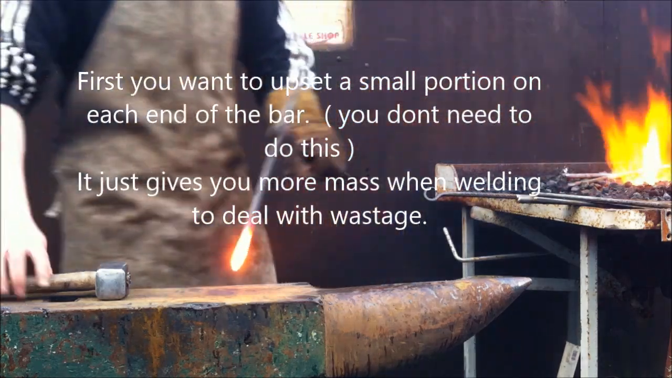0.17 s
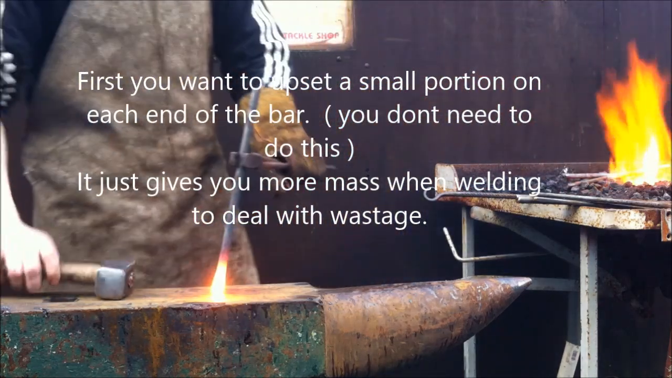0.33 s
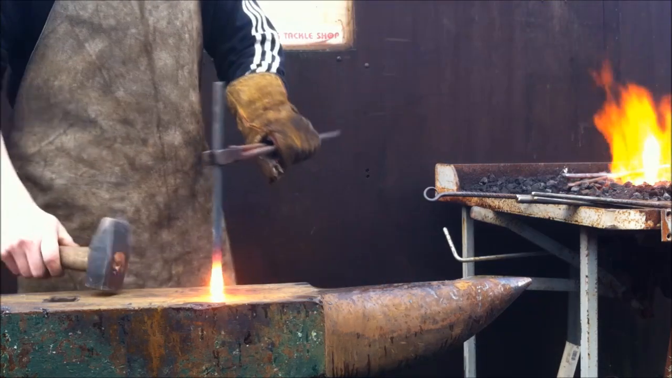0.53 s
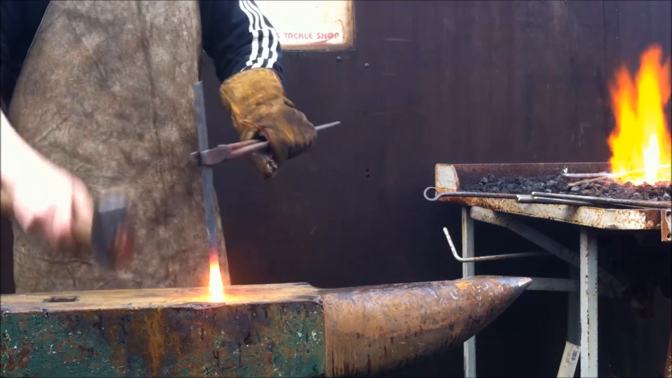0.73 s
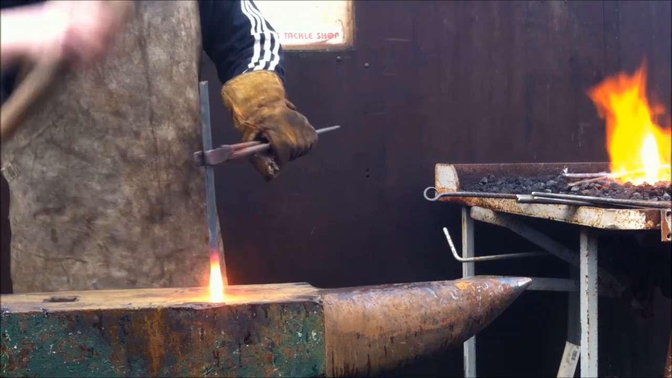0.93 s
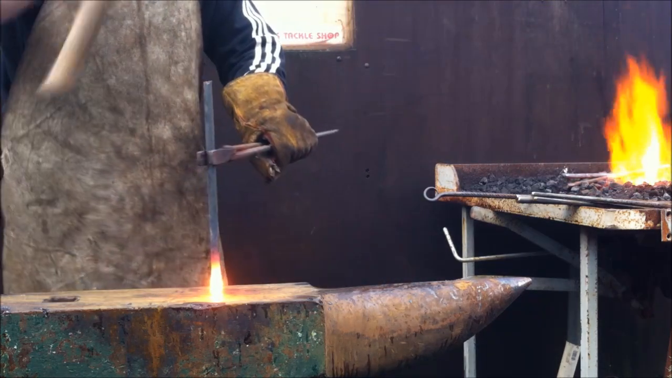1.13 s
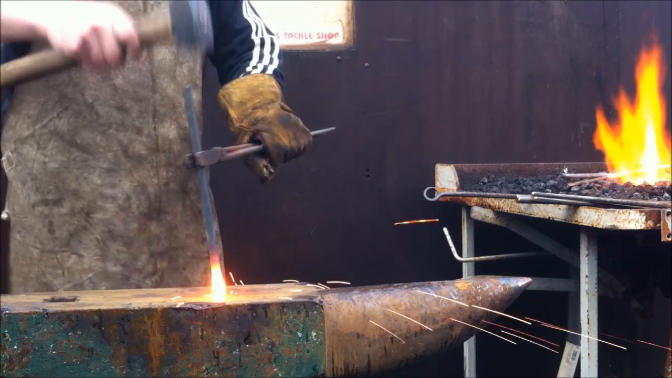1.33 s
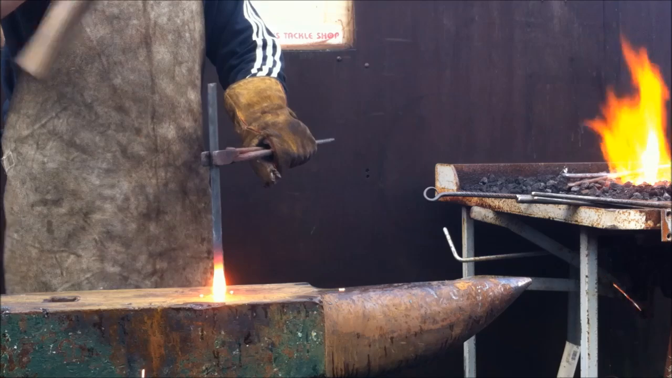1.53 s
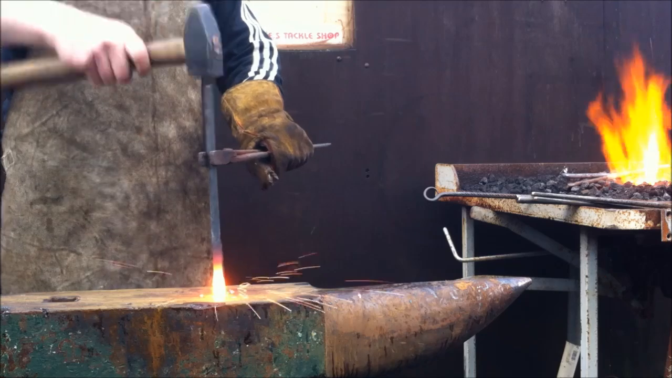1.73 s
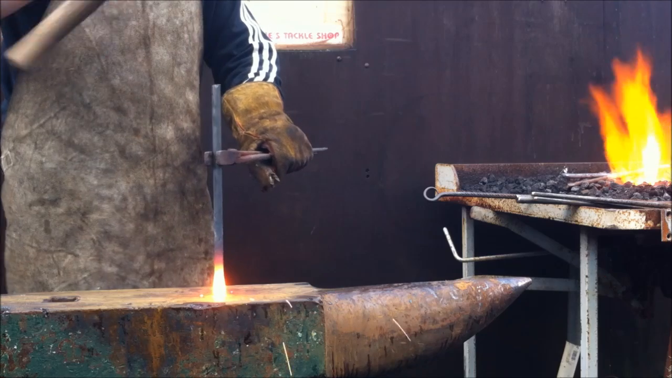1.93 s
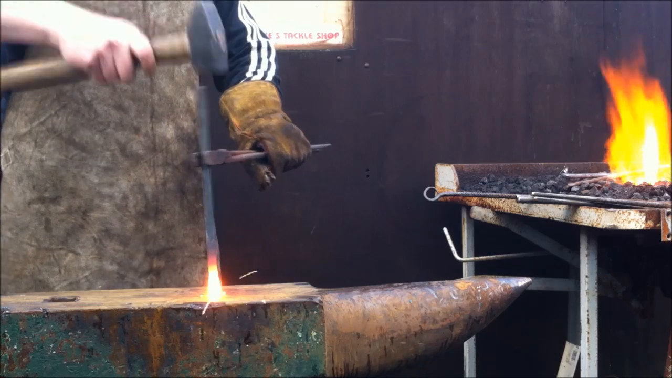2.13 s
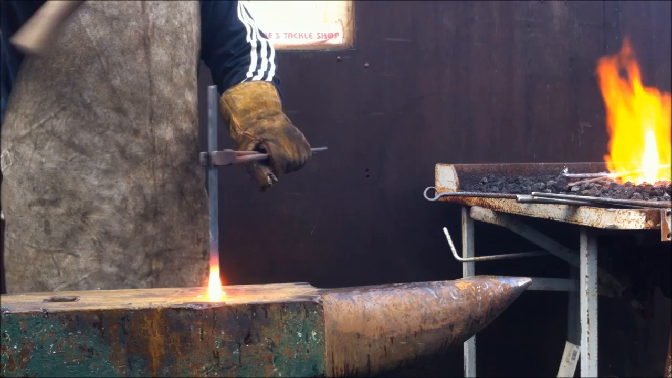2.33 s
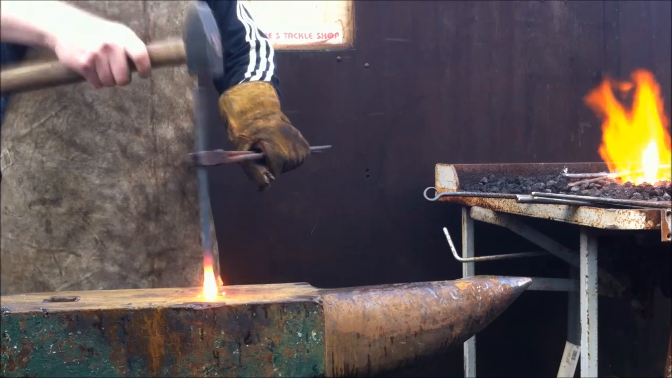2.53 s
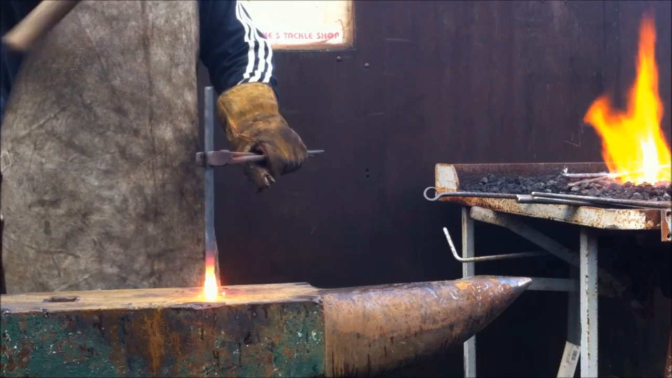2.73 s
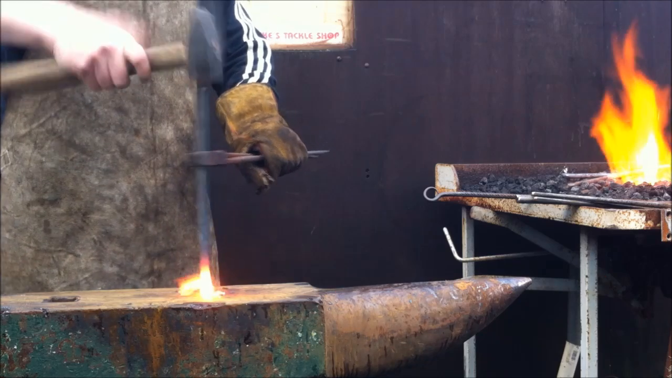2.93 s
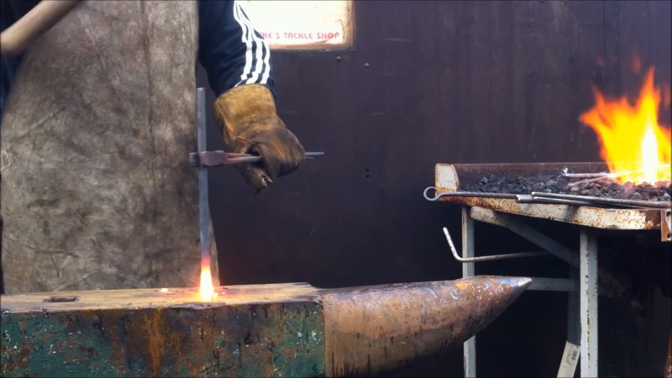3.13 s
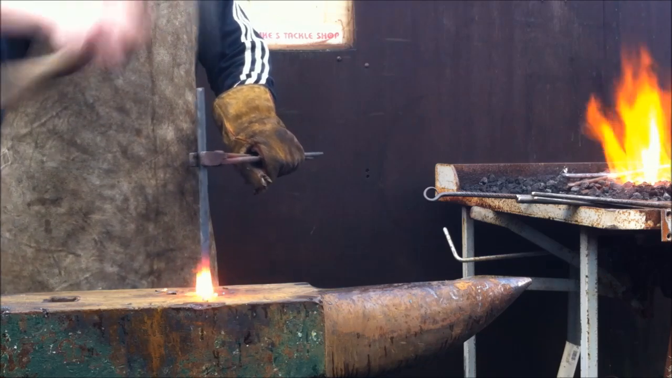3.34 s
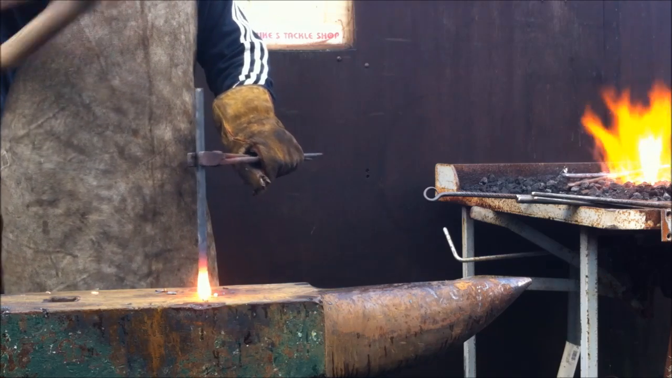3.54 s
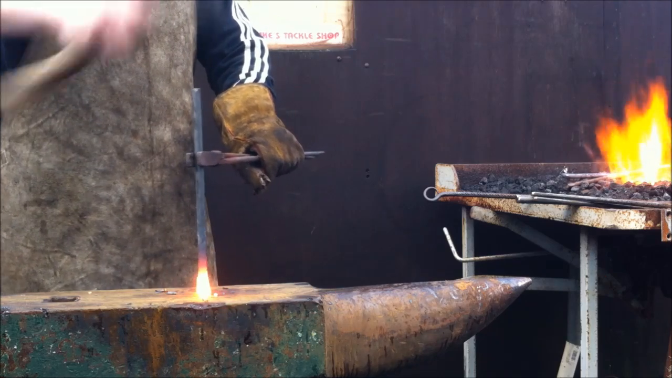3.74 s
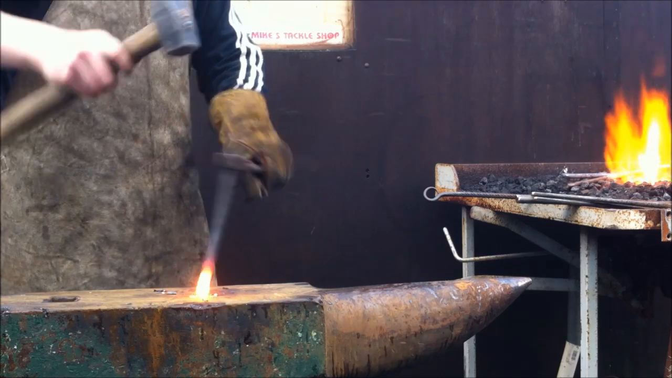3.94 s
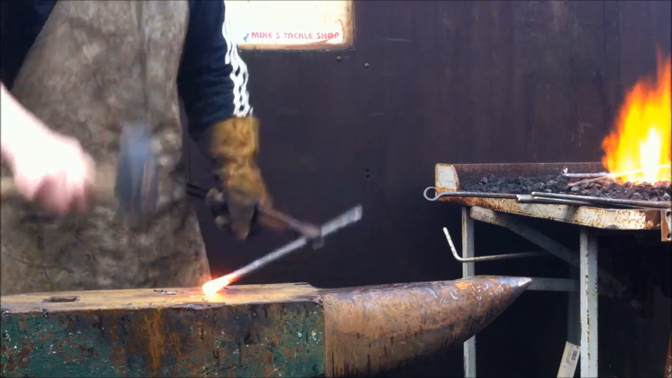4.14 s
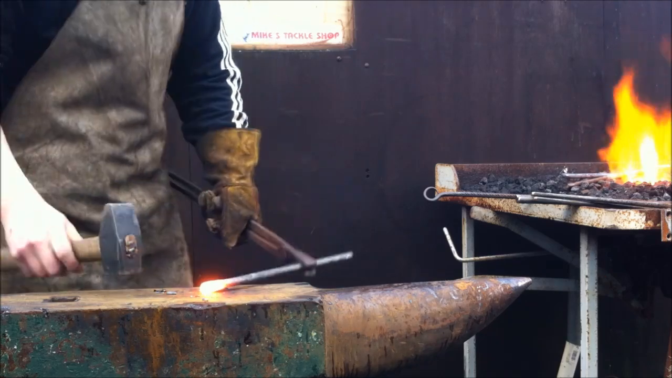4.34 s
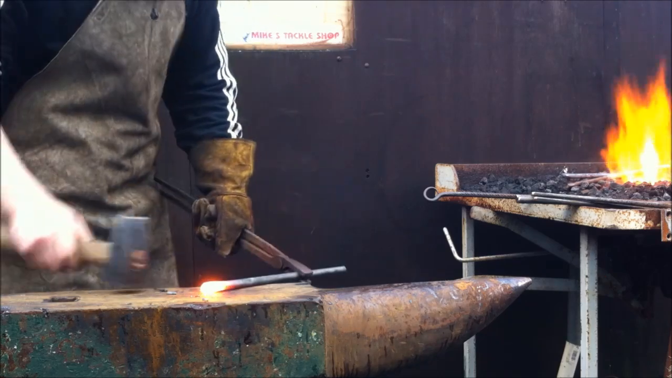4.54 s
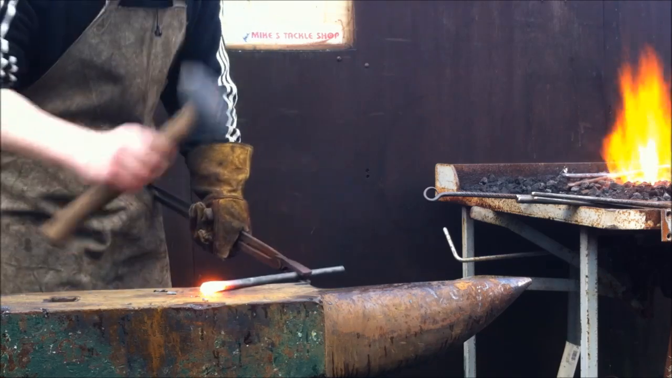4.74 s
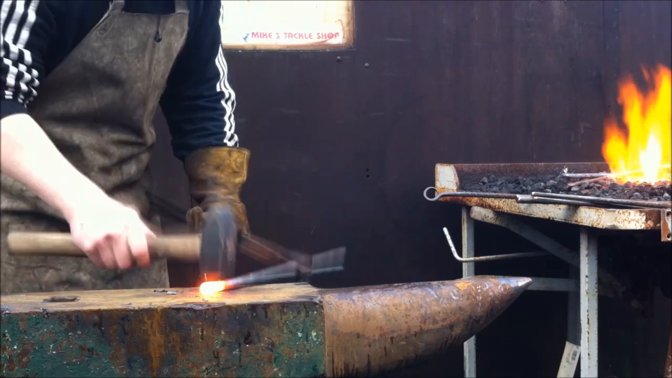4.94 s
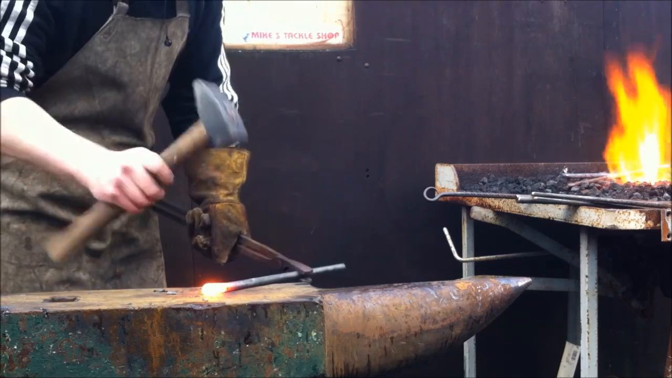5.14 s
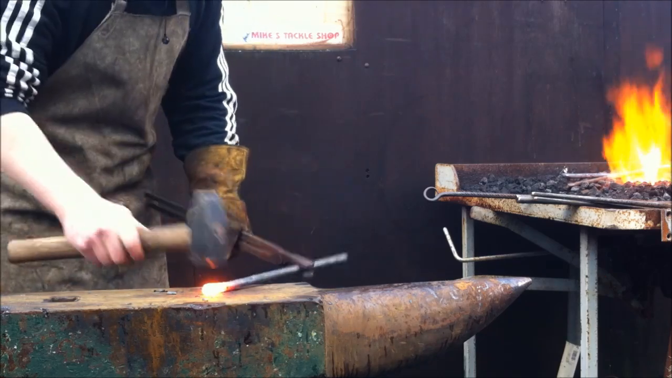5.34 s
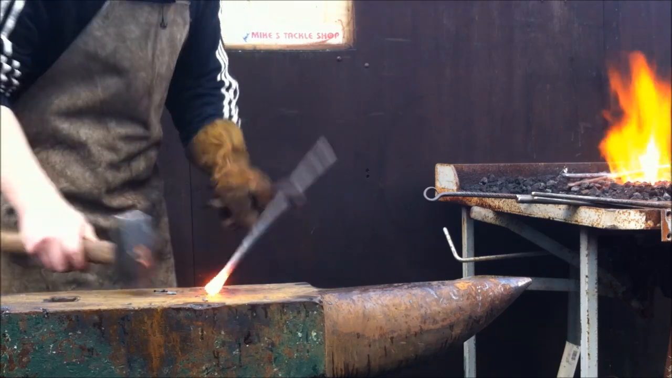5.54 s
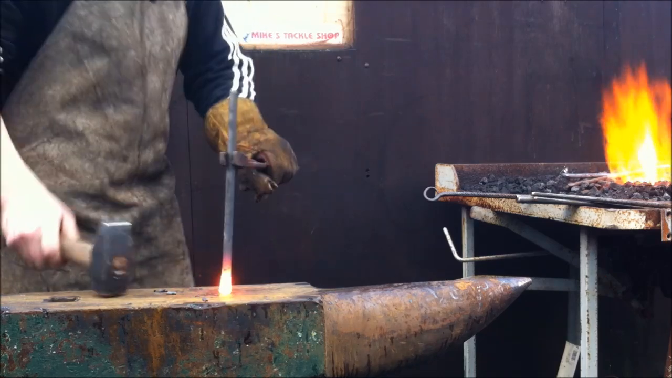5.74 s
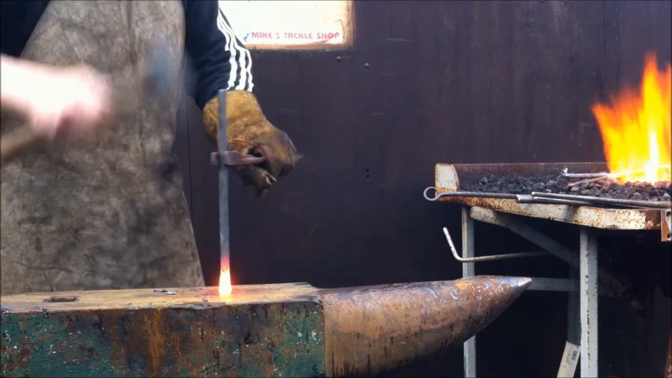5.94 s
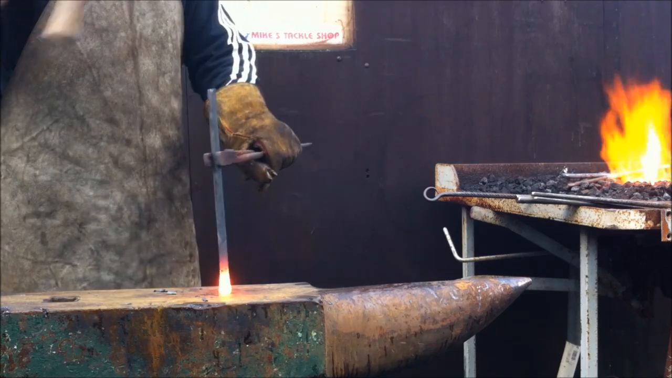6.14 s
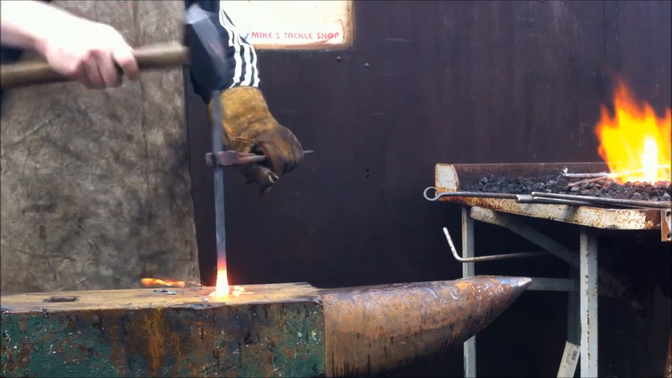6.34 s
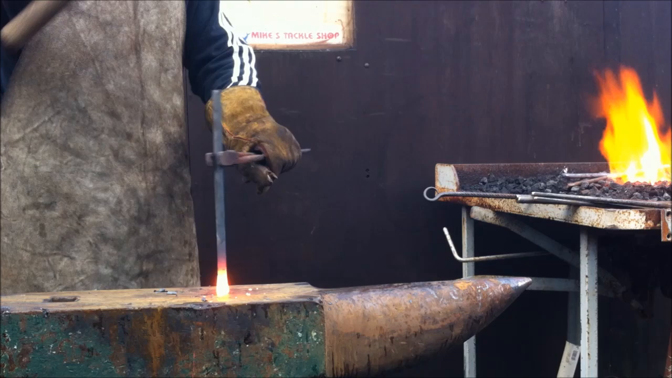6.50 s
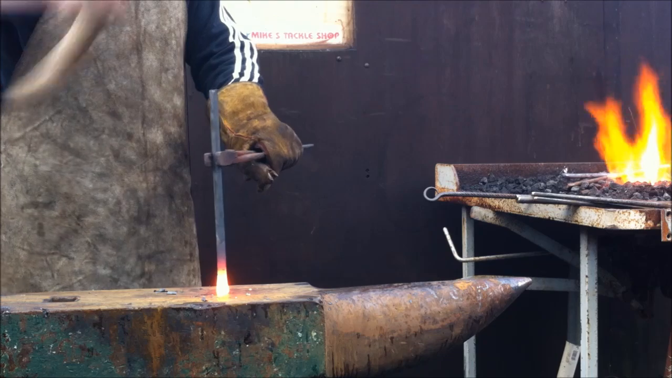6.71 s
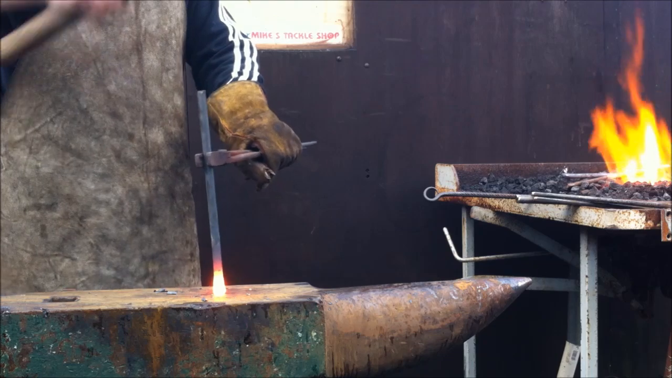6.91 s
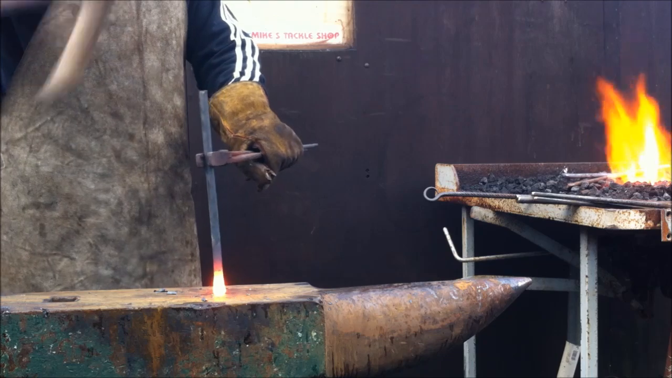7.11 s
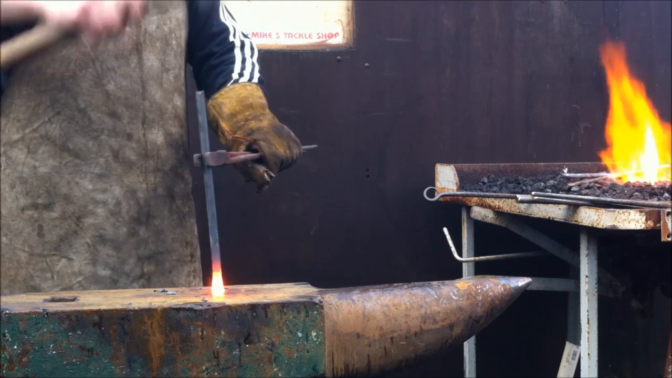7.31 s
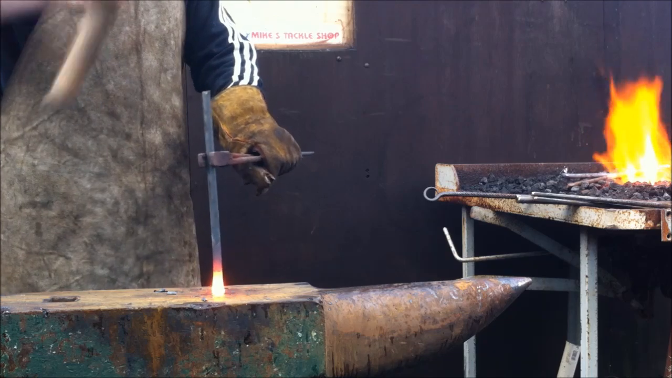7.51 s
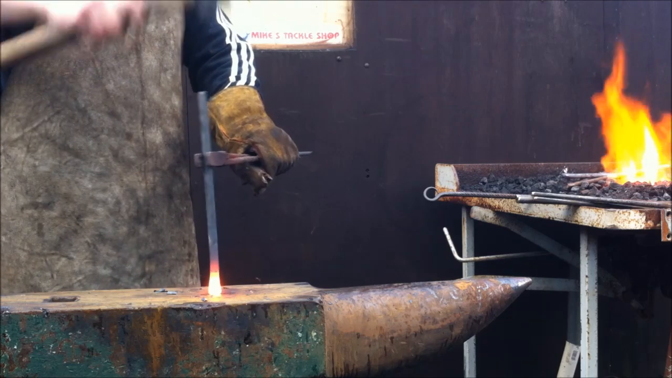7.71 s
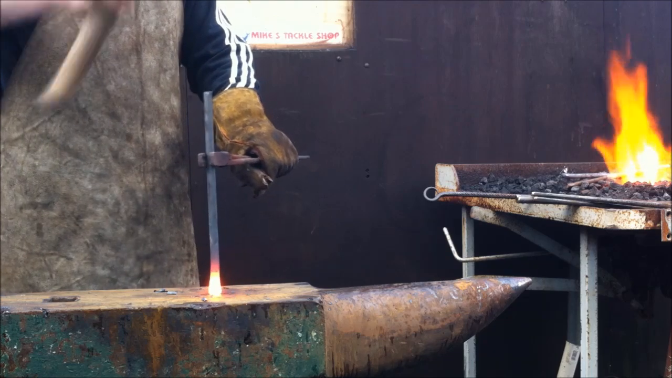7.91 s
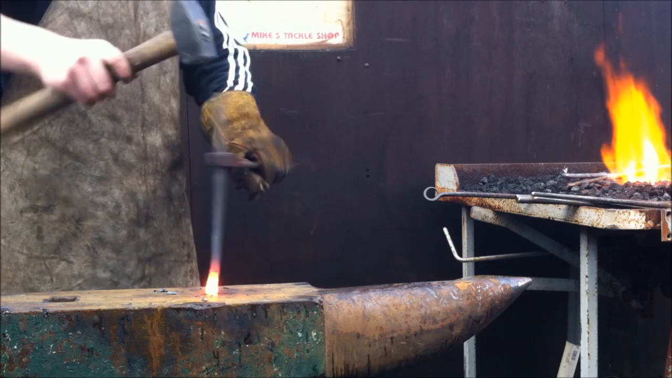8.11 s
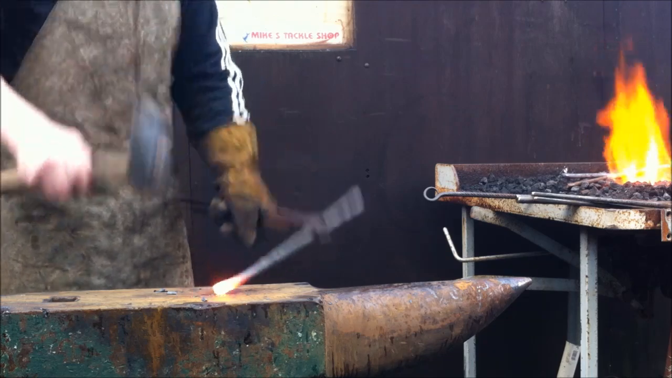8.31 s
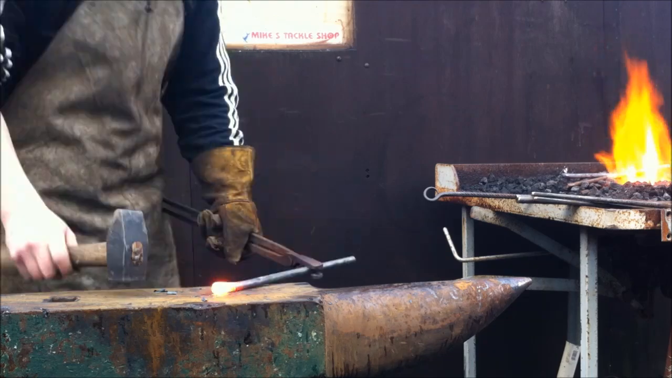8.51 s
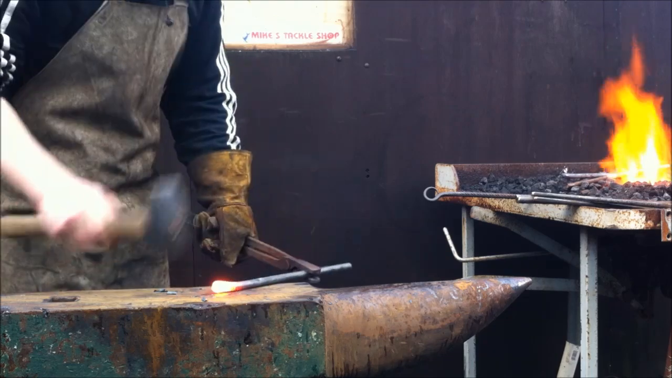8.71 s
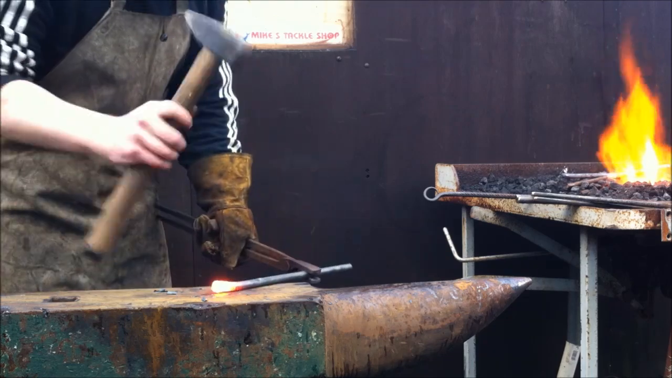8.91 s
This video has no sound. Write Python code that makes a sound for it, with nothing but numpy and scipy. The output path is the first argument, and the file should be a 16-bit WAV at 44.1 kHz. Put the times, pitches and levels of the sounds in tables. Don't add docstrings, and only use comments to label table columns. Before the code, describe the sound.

A close, small microphone in an outdoor forge picks up dry, piercing hammer cracks with brief metallic ring and quick slap echoes. Light anvil taps open, separate and close two steady rounds of blows. Between strokes there is quiet fire roar, thin hiss and a faint steady hum. During the second round, tyre roar and gear whine rise from a nearby road, with a change of gear near the end.

```python
import sys
import numpy as np
from scipy import signal
from scipy.fft import rfft, irfft
from scipy.io import wavfile
from scipy.ndimage import uniform_filter1d

SR = 44100
rng = np.random.default_rng(int(sys.argv[2]) if len(sys.argv) > 2 else 0)


def bounce(signal):
    frames = np.transpose(np.atleast_2d(signal))
    limited = np.clip(frames, -1, 1)
    pcm = np.round(limited * 32767).astype(np.int16)
    wavfile.write(sys.argv[1], SR, pcm)


def ratio_of_db(decibels):
    return 10 ** (np.asarray(decibels, float) / 20)


N = 395180

# (frequency [Hz], level [dB per Hz])
FIRE_SPECTRUM = [(25, -42), (75, -64), (105, -19), (160, -7), (230, -3), (400, -4), (750, -8), (900, -6),
                 (1400, -14), (2600, -20), (4500, -32), (7000, -44), (16500, -61)]
# (frequency [Hz], level [dB per Hz])
HISS_SPECTRUM = [(1000, -25), (4000, -5), (6000, -4), (9000, -1), (14000, -4), (15600, -6.5), (16500, -26)]
FIRE_DB, HISS_DB = -45.5, -59
HUM_HZ, HUM_DB = 876, -50

# (time [s], peak [dB], ring [dB], squareness = low weight [dB], edge = treble weight [dB])
TAPS = [(0.4486, -30.5, -29, 22, -20), (0.5237, -26, -27, 9, -22), (0.7047, -10.5, -14, -1, -13.5),
        (0.7666, -15.5, -9, -8.5, -11), (0.8092, -29.5, -17, 18, -7), (4.4374, -7, -8.5, -7, -10.5),
        (4.6034, -7, -3, -8, -14), (5.6956, -2.5, -16, -7.5, -3), (5.8023, -7, -18, -12.5, -10.5),
        (5.872, -12, -8, -12, -16), (8.6347, -6, -9.5, -13.5, -10), (8.773, -5.5, -11.5, -4, -17)]
# (time [s], peak [dB],
# squareness = low weight [dB], softness = middle weight [dB], edge = treble weight [dB])
BAR_BLOWS = [(1.393, -1, -10.5, 1, -1.5), (1.855, -1.5, -6.5, 1, -1), (2.27, -0.5, -2.5, -1.5, -3),
             (2.68, 1.5, -3.5, -5, -1), (3.099, 0.5, -4.5, -4.5, -0.5), (3.527, 2, -2.5, -4, 1.5),
             (3.935, 1.5, -2, -4.5, -3), (6.485, -0.5, -6, -4, 1.5), (6.932, 4.5, -1.5, -4, 1.5),
             (7.355, 4, 0.5, -3.5, 0), (7.76, 4, -3, -6.5, 2), (8.158, 3.5, -0.5, -1.5, 2)]
# (time [s], peak [dB], ring [dB], squareness [dB], horn [dB])
FLAT_BLOWS = [
    (5.116, -2.5, -22, 3.5, -32),
    (5.463, -4.5, -30, 7, -17),
]
COLOUR_HZ = [250, 900, 2200, 4000, 9500, 16000]
# (frequency [Hz], level [dB], t60 [s])
ANVIL_MODES = [(1040, -12, .12), (1095, -11, .16), (1700, -14, .06), (2024, -12, .12), (2293, 0, .21),
               (2405, -3, .15), (2650, -11, .18), (3241, -7, .13), (3560, -7, .06), (3957, -6, .11),
               (4054, -12, .18), (5033, -3, .14), (5400, -9, .06), (5760, -14, .12), (6460, -6, .12),
               (8990, -11, .08), (11600, -9, .05), (13800, -2, .07), (14310, 1, .1)]
# (frequency [Hz], level [dB], t60 [s])
BAR_MODES = [(300, -12, .06), (700, -9, .05), (1080, -12, .15), (1340, -9, .12), (2000, -3, .04),
             (2310, -6, .12), (3214, -5, .1), (3450, 1, .06), (3790, 2, .055), (4090, -2, .06),
             (4280, -10, .14), (4800, -4, .04), (5150, -2, .035), (5480, 0, .04), (5900, -5, .04),
             (6500, -10, .13), (6800, -3, .03), (7550, -5, .03), (8200, -4, .025), (9550, -3, .025),
             (11400, -5, .025)]
# (frequency [Hz], level [dB per Hz])
ANVIL_BODY = [(40, -27), (300, 0.5), (600, -0.5), (1050, 8.5), (1600, 1), (2300, 9.5), (2900, 5), (3800, 4),
              (5100, 4.5), (6500, 3), (8000, -2), (12500, -4), (14300, 2), (16500, -25)]
# (frequency [Hz], level [dB per Hz])
BAR_BODY = [(40, 2), (120, -20), (300, 2.5), (700, 1), (1080, -2.5), (1500, -7), (2200, 0.5), (2800, -3),
            (3600, 6), (4600, 1), (6600, 2.5), (10000, 3.5), (14500, 2), (16500, -10)]
BLOW_RING_DB, FLAT_SOFT_DB, FLAT_EDGE_DB, TAP_SOFT_SHARE = -16, 6, 9, 0.45
HORN_HZ, HORN_T60_S, HORN_BLOW_DB, HORN_TAP_DB = 1081, 0.2, -22.5, -15
HORN_PER_SQUARE, HORN_SQUARE_MAX_DB = 1.4, 2
THUD_HZ, THUD_DB, THUD_T60_S = 312, -33.5, 0.095

# (delay [s], level [dB])
ECHOES = [
    (.0088, -10),
    (.0098, -10),
    (.0112, -13),
    (.0142, -14),
    (.034, -18.5),
    (.0348, -22),
    (.048, -22),
]
# (frequency [Hz], t60 [s])
YARD_T60 = [(250, 0.24), (660, 0.21), (1740, 0.2), (4590, 0.19), (12100, 0.2)]

# (time [s], length [s], level [dB])
SPITS = [
    (2.59, 0.036, -53),
    (4.777, .035, -54),
    (6.098, .04, -57),
    (7.112, .018, -50),
]

# (frequency [Hz], level [dB per Hz])
TYRE_SPECTRUM = [(24, -68), (40, -87), (183, -4.5), (337, -12.5), (473, 0), (621, -6), (933, -3),
                 (1250, -12.5), (2830, -18), (3400, -26.5), (3890, -27.5), (9000, -40.5), (11700, -42),
                 (19800, -120)]
# (time [s], level [dB])
NEARING = [
    (5, -55.5),
    (6, -51),
    (6.4, -49.5),
    (7, -38),
    (7.5, -33.5),
    (8.2, -29.5),
    (8.96, -24.5),
]
# (frequency [Hz], level [dB])
ENGINE_ORDERS = [(195, 0), (482, 0)]
GEAR_HZ, FIRING_HZ = 594, 100
SHIFT_S, SHIFT_LENGTH_S = 8.05, 0.25
# (gear whine [dB], engine firing [dB], upper orders [dB])
LOW_GEAR = (-3.1, -16.5, -27)
# (gear whine [dB], engine firing [dB], upper orders [dB])
HIGH_GEAR = (-16.5, -31.5, -18)

# (time [s], gain [dB])
GAIN = [
    (0, 1),
    (.8, 0.5),
    (1.38, 0),
    (1.48, -2),
    (1.9, -1),
    (5.4, -1),
    (6.4, 1),
    (6.55, -4.5),
    (8.96, -4.5),
]
# (time [s], threshold [dB])
DROPOUTS = [(.452, -61), (1.478, -65), (1.563, -78.5), (1.708, -76.5), (2.093, -76.5), (2.255, -67),
            (2.283, -39), (2.949, -72), (3.29, -66.5), (3.46, -76), (3.512, -60), (4.142, -78.5),
            (4.528, -63), (4.907, -78.5), (5.253, -75), (5.479, -48.5), (5.955, -69), (6.19, -73),
            (6.319, -71), (6.81, -74), (7.151, -75), (7.685, -73.5), (8.111, -58), (8.495, -69),
            (8.538, -65), (8.668, -50), (8.813, -55)]
# (time [s], threshold [dB])
LONG_DROPOUTS = [
    (0.763, -55),
    (3.577, -51),
]
DROPOUT_S = 0.026
AHEAD_S, AHEAD_LENGTH_S, AHEAD_DB = 0.0094, 0.0079, -59
EDGE_HZ, TOP_HZ = 15800, 16950


def evened(x):
    return x / np.sqrt(np.mean(x ** 2) + 1e-20)


def read(points, hz):
    f, value = np.transpose(points)
    return np.interp(np.log(hz + 1), np.log(f + 1), value)


def curve(rows, axis):
    rows = np.array(rows)
    return np.interp(np.arange(N) / SR, rows[:, 0], rows[:, axis])


def add(mix, s, sound):
    part = mix[round(s * SR):][:len(sound)]
    part += sound[:len(part)]


def wash(spectrum, patchy_db):
    hz = np.fft.rfftfreq(1024, 1 / SR)
    real, imag, patches = rng.standard_normal((N // 256 + 5, 513, 3)).T
    patches = uniform_filter1d(patches, size=8, axis=0)
    patches = evened(uniform_filter1d(patches, size=14, axis=1))
    level_db = read(spectrum, hz)[:, None] + patchy_db * patches
    z = (real + 1j * imag) * ratio_of_db(level_db)
    return evened(signal.istft(z, nperseg=1024, noverlap=768)[1][:N])


def whine(hz, width, steady):
    r = np.exp(-np.pi * width / SR)
    a, b = (evened(signal.lfilter([1], [1, -r], v)) for v in rng.standard_normal((2, N)))
    carrier = np.exp(2j * np.pi * np.cumsum(hz * np.ones(N)) / SR)
    return evened(((steady + a + 1j * b) * carrier).real)


def forge():
    roar = ratio_of_db(FIRE_DB) * wash(FIRE_SPECTRUM, patchy_db=1.95)
    hiss = ratio_of_db(HISS_DB) * wash(HISS_SPECTRUM, patchy_db=3.0)
    hum = ratio_of_db(HUM_DB) * whine(HUM_HZ, width=9.7, steady=6.7)
    return roar + hiss + hum


def strike(row, body, modes, crack_s, ring_db, shift):
    s, peak_db, low, mid, high, top = row
    t, hz = np.arange(12000) / SR, np.fft.rfftfreq(12000, 1 / SR)
    colour = list(zip(COLOUR_HZ, [low + 3, low + 5, mid + 4, high + 1, top - 4, top - 4]))
    gain = ratio_of_db(read(colour, hz) + read(body, hz))
    lead = .004
    after = np.maximum(t - lead, 0)

    z = rfft(rng.standard_normal(len(t)) * (t > lead) * np.exp(-(after / crack_s) ** 2))
    z = z / np.sqrt(uniform_filter1d(abs(z) ** 2, size=110))
    contact = np.clip((t - lead) / .0004 + 1, 0, 1)
    crack = irfft(z * gain, len(t)) * contact
    crack = crack / np.sqrt(np.sum(crack ** 2) / (crack_s * SR))

    smear = evened(irfft(rfft(rng.standard_normal(len(t))) * gain, len(t)))
    smear = ratio_of_db(-21) * smear * (t < lead) * (0.13 + t / lead)

    f, db, t60 = np.transpose(modes)[:, :, None]
    luck, phase, grip = rng.standard_normal((3, len(modes), 1))
    f = f * (1 + shift * grip * np.clip(f / 3000 - .3, 0, 1))
    luck_db = 1.5 * luck
    decay = ratio_of_db(db + luck_db + read(colour, f) - 60 * after / t60)
    ring = (decay * np.sin(2 * np.pi * f * after + phase)).sum(0)
    ring = ratio_of_db(ring_db) * ring * np.minimum(after / 0.0015, 1)
    return s - lead, ratio_of_db(peak_db) * (crack + smear + ring)


def anvil_taps():
    out = np.zeros(N)
    for s, db, ring, square, edge in TAPS:
        row = s, db, ring + square, ring + TAP_SOFT_SHARE * square, ring, ring + edge
        add(out, *strike(row, ANVIL_BODY, ANVIL_MODES, crack_s=0.003, ring_db=-1.5, shift=0.0077))
    return out


def horn():
    out, t = np.zeros(N), np.arange(12000) / SR
    strokes = [(s, db + HORN_TAP_DB, square) for s, db, _, square, _ in TAPS]
    strokes += [(s, db + HORN_BLOW_DB, square) for s, db, square, _, _ in BAR_BLOWS]
    rung = [(s, db + HORN_PER_SQUARE * min(square, HORN_SQUARE_MAX_DB)) for s, db, square in strokes]
    rung += [(s, db + horn_db) for s, db, _, _, horn_db in FLAT_BLOWS]
    for (s, db), grip in zip(rung, rng.standard_normal(len(rung))):
        tone = np.sin(2 * np.pi * HORN_HZ * (1 + 0.0048 * grip) * t)
        add(out, s, ratio_of_db(db - 60 * t / HORN_T60_S) * np.minimum(t / 0.0032, 1) * tone)
    return out


def yard(x, tail_db):
    early = np.zeros(3000)
    for s, db in ECHOES:
        add(early, s, ratio_of_db(db) * np.array([.8, .3]))
    out = x + signal.oaconvolve(x, early)[:N]
    turn = np.pi * np.arange(N) / SR * .83
    size = SR // 2
    for k in range(3):
        taps = rng.standard_normal(size) * np.clip(np.arange(size) / (0.0026 * SR), .2, 1)
        hz, t, z = signal.stft(taps, SR, nperseg=128)
        decay = ratio_of_db(-60 * t / read(YARD_T60, hz)[:, None])
        tail = rfft(signal.istft(z * decay, SR, nperseg=128)[1], SR)
        power = abs(tail) ** 2
        ripple = uniform_filter1d(power, size=40) / uniform_filter1d(power, size=600)
        tail = irfft(tail / np.sqrt(ripple), SR)[:size]
        feed = x * np.cos(turn + k * np.pi / 3) * np.sqrt(2 / 3)
        out += ratio_of_db(tail_db) * signal.fftconvolve(feed, tail / np.linalg.norm(tail))[:N]
    return out


def bar_blows():
    out = np.zeros(N)
    for s, db, square, soft, edge in BAR_BLOWS:
        row = s, db, *(BLOW_RING_DB + np.array([square, soft, 0, edge]))
        add(out, *strike(row, BAR_BODY, BAR_MODES, crack_s=.0025, ring_db=-3.5, shift=0.0198))
    return out


def ground_jolts():
    out, t = np.zeros(N), np.arange(5000) / SR
    thud = ratio_of_db(-60 * t / THUD_T60_S) * np.sin(2 * np.pi * THUD_HZ * t) * np.minimum(t / .003, 1)
    for s, db, *_ in BAR_BLOWS + FLAT_BLOWS:
        add(out, s, ratio_of_db(db - 49) * signal.windows.hann(round(0.0084 * SR)))
        add(out, s, ratio_of_db(db + THUD_DB) * thud)
    return out


def spits():
    out = np.zeros(N)
    for s, length, db in SPITS:
        n = round(length * SR)
        puff = np.diff(rng.standard_normal(n + 1)) * signal.windows.tukey(n, .5)
        add(out, s, ratio_of_db(db) * puff)
    return out


def vehicle():
    t = np.arange(N) / SR
    shifted = np.clip((t - SHIFT_S) / SHIFT_LENGTH_S + .5, 0, 1)
    gear_db, firing_db, upper_db = (a + (b - a) * shifted for a, b in zip(LOW_GEAR, HIGH_GEAR))
    tyres = wash(TYRE_SPECTRUM, patchy_db=1.2)
    gear = ratio_of_db(gear_db) * whine(GEAR_HZ, width=11, steady=1.23)
    firing = ratio_of_db(firing_db) * whine(FIRING_HZ, width=2.1, steady=2.2)
    orders = sum(ratio_of_db(db) * whine(hz, width=7.7, steady=0.76) for hz, db in ENGINE_ORDERS)
    upper = ratio_of_db(upper_db) * orders
    approach = np.clip(t - 4, 0, 1) * ratio_of_db(curve(NEARING, axis=1))
    return approach * (tyres + gear + firing + upper)


def flat_blows():
    out = np.zeros(N)
    for s, db, ring, square, _ in FLAT_BLOWS:
        row = s, db, ring + square, ring + FLAT_SOFT_DB, ring, ring + FLAT_EDGE_DB
        add(out, *strike(row, BAR_BODY, ANVIL_MODES, crack_s=0.0029, ring_db=-18.0, shift=0.0067))
    return out


def scene():
    steel = anvil_taps() + bar_blows() + flat_blows()
    steel = signal.lfilter(*signal.butter(1, 200, "high", fs=SR), steel)
    struck = ratio_of_db(-8.0) * yard(steel, tail_db=-3.5)
    return (forge() + struck + horn() + ground_jolts() + spits() + vehicle())[None]


def band_limit(x):
    narrow, wide = (signal.oaconvolve(x, signal.firwin(401, hz, window=("kaiser", 9), fs=SR), "same")
                    for hz in (EDGE_HZ, TOP_HZ))
    loud = 1. * (uniform_filter1d(x ** 2, size=300) > ratio_of_db(-24) ** 2)
    loud = uniform_filter1d(loud, size=200)
    return narrow + ratio_of_db(-22) * loud * (wide - narrow)


def drop_faint(x):
    out = x.copy()
    windows = [(s, DROPOUT_S, db) for s, db in DROPOUTS]
    windows += [(s, 2 * DROPOUT_S, db) for s, db in LONG_DROPOUTS]
    windows += [(row[0] - AHEAD_S, AHEAD_LENGTH_S, AHEAD_DB) for row in BAR_BLOWS + FLAT_BLOWS + TAPS]
    for s, length, keep_db in windows:
        n = round(length * SR)
        start = round(s * SR) - n // 2
        z = rfft(x[start:][:n] * signal.windows.tukey(n, .85))
        over_db = 20 * np.log10(abs(z) * 2 / n + 1e-9) - keep_db
        weak = np.clip(-over_db / 3, 0, 1)
        add(out, start / SR, -irfft(z * weak, n))
    return out


def top_cut(x):
    return signal.sosfilt(signal.butter(12, 16990, fs=SR, output="sos"), x)


def record(dry):
    x = 1.1 * np.tanh(dry[0] * ratio_of_db(curve(GAIN, axis=1)) / 1.1)
    mix = drop_faint(band_limit(x))[None]
    return top_cut(mix)


dry = scene()
out = record(dry)
bounce(out)
```